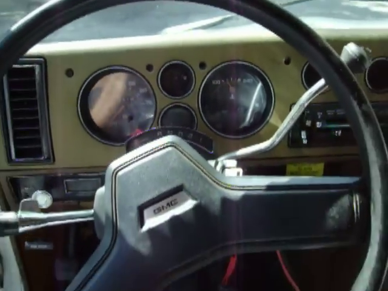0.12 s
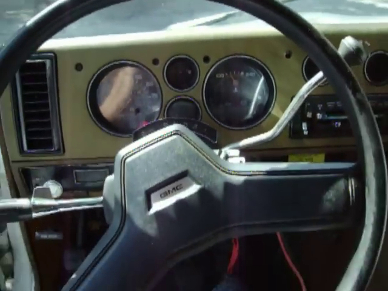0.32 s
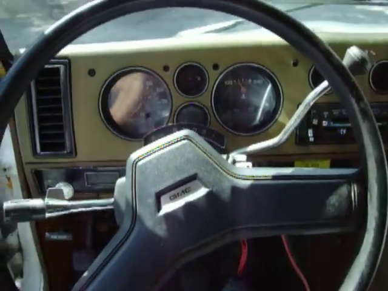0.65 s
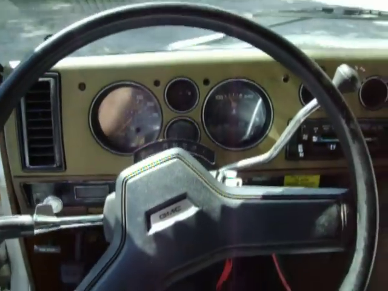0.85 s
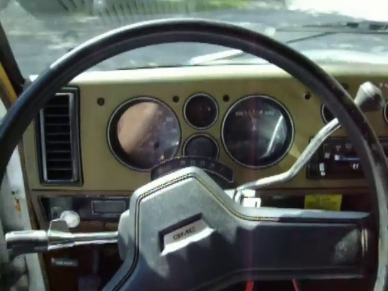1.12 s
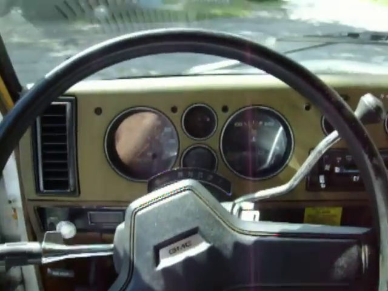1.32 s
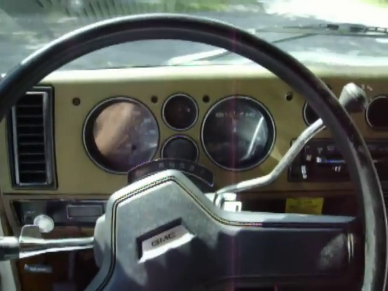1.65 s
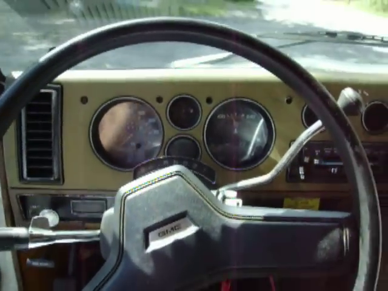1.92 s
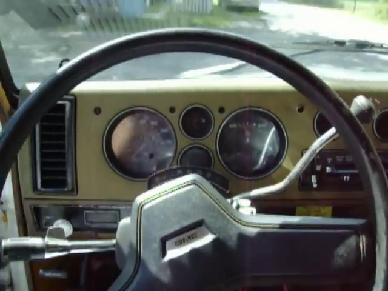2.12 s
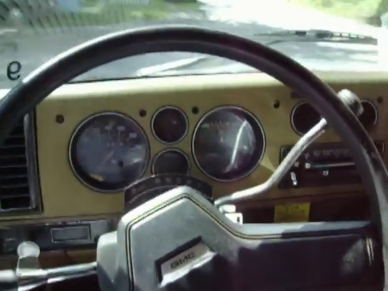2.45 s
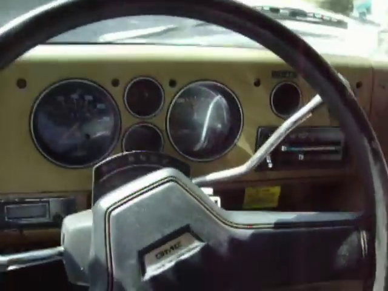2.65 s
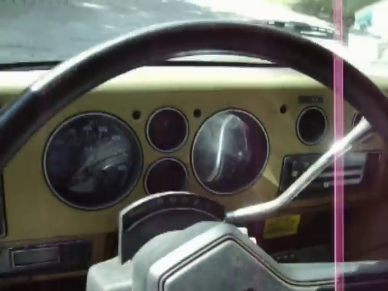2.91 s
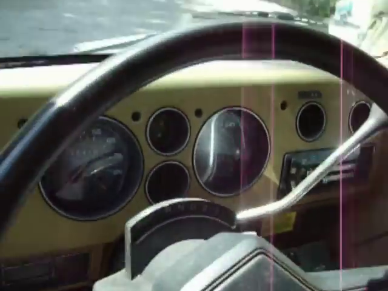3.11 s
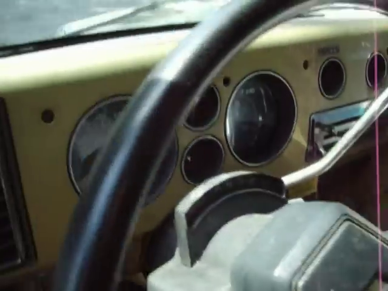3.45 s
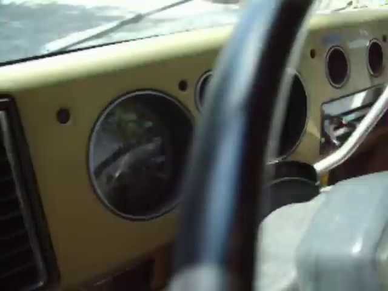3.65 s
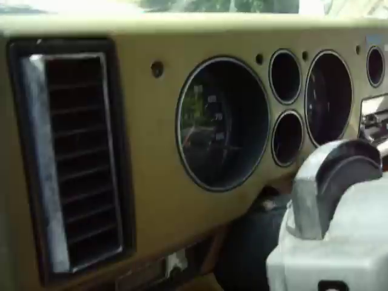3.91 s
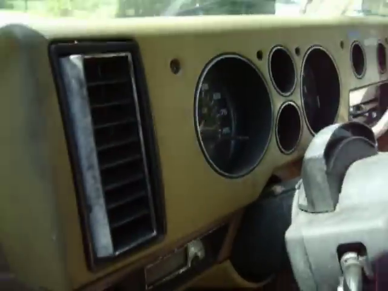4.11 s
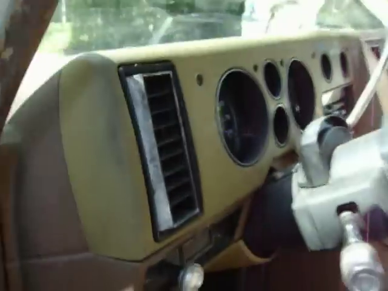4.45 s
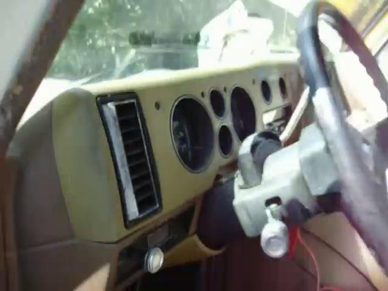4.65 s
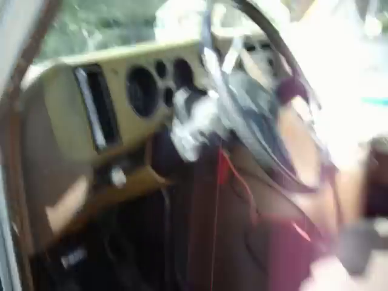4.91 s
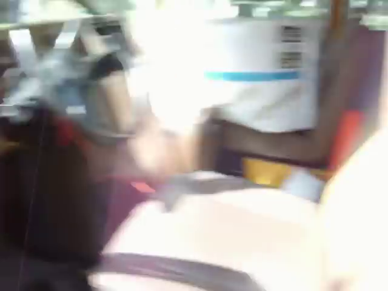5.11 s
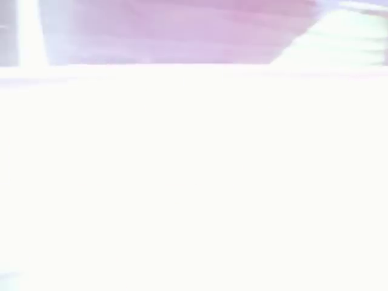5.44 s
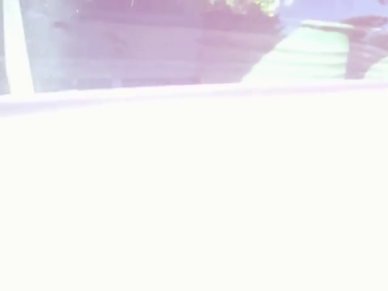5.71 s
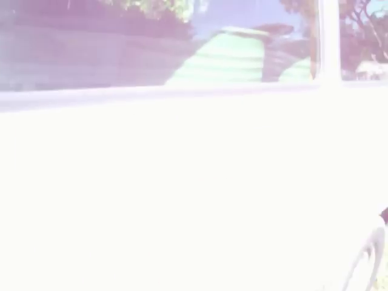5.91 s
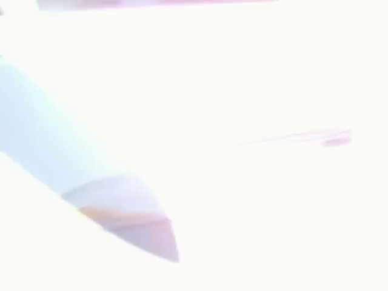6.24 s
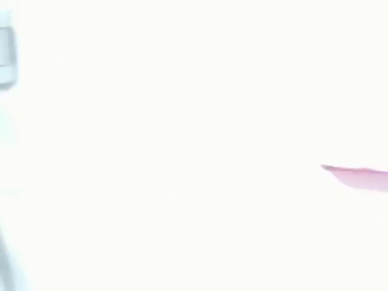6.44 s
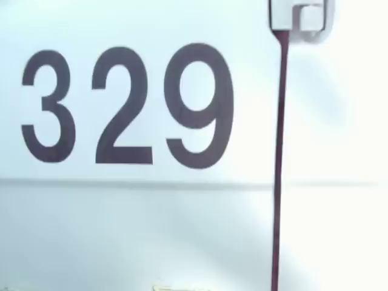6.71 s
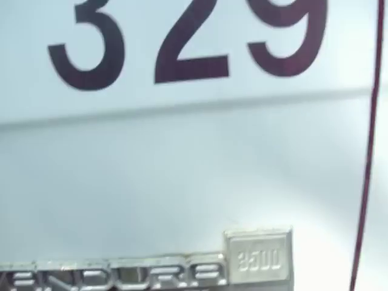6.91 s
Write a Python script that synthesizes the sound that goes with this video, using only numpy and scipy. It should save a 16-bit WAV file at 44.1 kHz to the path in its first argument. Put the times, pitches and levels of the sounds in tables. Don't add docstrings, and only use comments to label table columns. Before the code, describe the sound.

Rough, rattling diesel idle heard in a cab, with hard knocks, brief fingernail ticks, and later sharp bumps and metallic chatter on the small camera.

```python
import sys
import numpy as np
from scipy import signal
from scipy.fft import rfft, irfft, next_fast_len
from scipy.io import wavfile
from scipy.ndimage import uniform_filter1d, minimum_filter1d, map_coordinates

SR = 44100
rng = np.random.default_rng(int(sys.argv[2]) if len(sys.argv) > 2 else 0)


def gain_from_db(level_db):
    decades = np.asarray(level_db, float) / 20
    return 10 ** decades


def wrap_up_sound(samples):
    columns = np.atleast_2d(samples).T
    tamed = np.clip(columns, -1, 1)
    steps = np.round(tamed * 32767).astype(np.int16)
    wavfile.write(sys.argv[1], SR, steps)


N = 311787


def unit(x):
    return x / np.sqrt(np.mean(x ** 2) + 1e-20)


def curves(rows):
    s, *columns = np.transpose(rows)
    return [np.interp(np.arange(N) / SR, s, column) for column in columns]


def wobble(rate):
    knots = rng.standard_normal(int(N * rate / SR) + 4)
    return map_coordinates(knots, [np.arange(N) * rate / SR])


def filtered(x, response):
    m = next_fast_len(N + SR // 2)
    return irfft(rfft(x, m) * response(np.fft.rfftfreq(m, 1 / SR)), m)[..., :N]


def colour(points):
    f, db = np.transpose(points)
    return lambda hz: gain_from_db(np.interp(np.log(hz + 1), np.log(f + 1), db, left=-120, right=-120))


def resonances(modes):
    def response(f):
        return sum((-1) ** k * gain_from_db(db) * 1j * f * width / (hz * hz - f * f + 1j * f * width)
                   for k, (hz, width, db) in enumerate(modes))
    return response


# [t/s, f/Hz, level/dB]
PANEL_BOOM = [
    (0.0, 49.7, -14),
    (0.264, 50.7, -34.5),
    (0.36, 48.6, -22.5),
    (0.46, 47.2, -27),
    (0.6, 54.5, -14.5),
    (0.68, 56, -25.5),
    (0.8, 55, -18),
    (0.93, 50.7, -20),
    (1.1, 50.4, -42.5),
]


def panel():
    hz, db = curves(PANEL_BOOM)
    sounding = np.clip((PANEL_BOOM[-1][0] - np.arange(N) / SR) / .05, 0, 1)
    return sounding * np.sqrt(2) * gain_from_db(db - 3.0) * np.sin(2 * np.pi * np.cumsum(hz) / SR)


# [t/s, peak level/dB, f/Hz, length/s]
CAMERA_BUMPS = [(.84, -16, 103, 0.079), (0.971, -19, 225.4, 0.045), (1.635, -5, 163.4, 0.029),
                (1.686, -7.5, 946, 0.012), (1.703, -9.5, 168, 0.021), (3.895, -11, 165, 0.025),
                (5.84, -12, 1231, 0.0081), (5.877, -5, 464, 0.011), (5.886, -19, 179, 0.011),
                (5.907, -4, 381, 0.0028), (5.945, -18, 333, 0.011), (5.99, -22, 160, 0.029),
                (6.059, -23.5, 243, 0.0084), (6.19, -23, 120.3, .04), (6.262, -14, 230, .009),
                (6.3, -22, 115.6, .04), (6.338, -11.5, 260, .005), (6.41, -15, 190, .008),
                (6.422, -12, 302, .006), (6.545, -17.5, 200, .012), (1.674, -9, 159, 0.0065),
                (1.682, -12.5, 1920, 0.0043), (2.0, -17.5, 139, .04), (3.02, -16.5, 198.5, .03)]


def bumps():
    out, t = np.zeros(N + SR), np.arange(SR // 4) / SR
    for s, db, hz, length in CAMERA_BUMPS:
        shape = np.clip(t * hz * 2, 0, 1) / (1 + (t / length) ** 6)
        out[round(s * SR):][:len(t)] += gain_from_db(db) * shape * np.sin(2 * np.pi * hz * t)
    return out[:N]


# [t/s, peak level/dB, f/Hz, t60/s]
FINGER_TICKS = [
    (2.5372, -7, 3900, .008),
    (2.549, -19, 4200, .006),
    (2.5542, -6, 3870, .008),
    (2.5617, -11, 4150, .013),
    (2.572, -8, 4160, .01),
    (2.5787, -6, 3200, .007),
    (2.5812, -10, 3600, .008),
]


def ticks():
    out, t = np.zeros(N + SR), np.arange(SR // 4) / SR
    for s, db, hz, t60 in FINGER_TICKS:
        casing_hz = rng.uniform(2500, 4600, (4, 1))
        ring = np.sin(2 * np.pi * hz * t) + .3 * np.sin(2 * np.pi * casing_hz * t).sum(axis=0)
        attack = 1 - np.exp(-(t / 0.0004) ** 2)
        decay = gain_from_db(db + 2.5 - 60 * t / max(t60, .002))
        out[round(s * SR):][:len(t)] += decay * attack * ring
    return out[:N]


# [t/s, level/dB]
CHATTER_LEVEL = [
    (6.12, -49.5),
    (6.19, -25.5),
    (6.25, -28),
    (6.285, -20.5),
    (6.345, -22.5),
    (6.375, -17),
    (6.43, -27),
    (6.5, -26),
    (6.56, -53),
]
# [f/Hz, width/Hz, level/dB]
RING_MODES = [(3520, 28, -6), (3850, 30, -12), (4010, 27, -7), (4160, 24, 1.5), (4400, 40, -9),
              (4710, 30, -10), (4910, 45, -10), (5180, 55, -15), (5450, 110, -19), (5830, 50, -27)]


def strap_ring():
    taps = (rng.random(N) < 900 / SR) * gain_from_db(2.5 * rng.standard_normal(N))
    return gain_from_db(curves(CHATTER_LEVEL)[0]) * unit(filtered(taps, resonances(RING_MODES)))


# [t/s, peak level/dB, length/s]
CASING_SHAKES = [(1.68, -6, 0.006), (1.689, -14, .008), (5.874, -9, .008), (5.9, -5.5, 0.0087),
                 (5.911, -8, 0.018), (5.94, -6.5, 0.011), (5.991, -13, 0.0089), (6.021, -17, .01),
                 (6.046, -15, 0.011), (6.142, -12.5, 0.011), (6.263, -14.5, .008), (6.286, -9, 0.0067),
                 (6.326, -17, 0.0096), (6.458, -17, 0.011), (6.502, -18, 0.0049), (6.547, -14, .008),
                 (6.561, -15.5, .008)]
# [f/Hz, level/dB]
CASING_COLOUR = [(700, -22), (1500, -8), (2600, -5), (3300, -4), (4200, -1), (4800, -7), (5400, -21),
                 (6300, -42)]


def rattles():
    shakes, t = np.zeros(N + SR), np.arange(SR // 16) / SR
    for s, db, length in CASING_SHAKES:
        shape = (1 - np.exp(-t / 0.00026)) / (1 + (t / length) ** 4)
        shakes[round(s * SR):][:len(t)] += gain_from_db(db) * shape
    return 0.45 * shakes[:N] * unit(filtered(rng.standard_normal(N), colour(CASING_COLOUR)))


# [t/s, cab enclosure level/dB, nearness to the standing-wave crest level/dB]
MIC_PLACE = [(0, 1, -2.5), (.35, -1, -4.5), (.7, -1.5, -10.5), (1.0, 1.5, -3), (1.4, 0, -0.5),
             (1.75, 1.5, -2), (2.3, -2, -1), (2.9, 2, 1), (3.3, 1, 3), (3.9, 0, 1), (4.1, -2.5, -3),
             (4.6, -3, 0), (5.0, -5, -4), (5.7, -10, -7.5), (5.95, 2.5, -12), (6.4, 0.5, -9),
             (6.7, -3.5, -11.5), (7.07, -3, -17)]


def place():
    return curves(MIC_PLACE)


# [t/s, firing rate/Hz]
IDLE_SPEED = [(0, 45.8), (1.1, 45.6), (1.35, 45.4), (2.0, 45.55), (2.7, 45.5), (3.1, 45.35), (4.3, 45.4),
              (4.6, 45.6), (5.2, 45.7), (5.6, 46.1), (7.07, 46.1)]
STRONG_FIRING_S = 4.557


def firings():
    turns = np.cumsum(curves(IDLE_SPEED)[0]) / SR
    return turns - turns[round(STRONG_FIRING_S * SR)]


EXHAUST_PUSH = [-1.2, -5.5, -1.5, 2, -2, 4, 3.4, -2]


def drone(turns):
    enclosed_db, wave_db = place()
    # order, level/dB, shares of enclosure, standing wave and exhaust push, lead/firings, unsteadiness/dB
    orders = [(2, -22, 0.049, 0.91, 1.25, 0, 2.6), (1, -26.5, 0.079, 0.25, .6, 0, 1.3),
              (3, -28.5, .6, 0.43, .8, 2, 3), (6, -34.5, -0.049, -0.35, .5, 3, 2.5)]
    out = np.zeros(N)
    for k, db, enclosed, wave, uneven, lead, unsteady_db in orders:
        push_db = np.interp(turns + lead, np.arange(8) + .5, EXHAUST_PUSH, period=8)
        level_db = db + enclosed * enclosed_db + wave * wave_db + uneven * push_db + unsteady_db * wobble(14)
        jitter = 0.089 * k * wobble(9) + 0.038 * k * k * wobble(30)
        out += np.sqrt(2) * gain_from_db(level_db) * np.sin(2 * np.pi * k * turns + jitter + rng.uniform(0, 6.0))
    return out


CYLINDER_KNOCK = [-1, -3, -6.5, -2, -4.5, -5, -3, -3.5]


def knocked(turns, scatter_db, pattern, depth_db, sharp):
    late = turns + .08 * wobble(40)
    k = np.floor(late).astype(int)
    chance_db = scatter_db * np.tanh(rng.standard_normal(1024))[k % 1024]
    size_db = pattern * np.array(CYLINDER_KNOCK)[k % 8] + chance_db
    flare = np.exp(-sharp * (late - k)) * gain_from_db(size_db + depth_db)
    return unit((1 + uniform_filter1d(flare, size=90)) * rng.standard_normal(N))


# [f/Hz, level/dB]
TIN_COLOUR = [(1650, -31.5), (2800, -10), (3480, -6), (3930, 1.5), (4150, 3.5), (4830, -8.5), (5580, -21),
              (5940, -34.5), (7720, -46.5), (13100, -120)]


def tin(turns):
    return unit(filtered(knocked(turns - 1, 4, .8, -4, 1.8), colour(TIN_COLOUR)))


# [f/Hz, level/dB]
BULKHEAD_COLOUR = [(280, -14.5), (380, -9), (550, -0.5), (700, -1.5), (950, -2), (1200, -21.5)]


def drum(turns):
    return unit(filtered(knocked(turns, 1.6, 0.7, -1.4, 2.0), colour(BULKHEAD_COLOUR)))


# [f/Hz, level/dB]
CAB_COLOUR = [(25, -40), (40, -16.5), (70, -3.5), (110, -6), (190, 1.5), (245, -4.5), (310, -1.5),
              (400, -5), (550, -10)]


def thuds(turns):
    starts = np.flatnonzero(np.diff(np.floor(turns)))
    cylinder = np.floor(turns[starts] + 1).astype(int) % 8
    uneven = np.array([0.89, -0.51, .5, -1.5, 0.024, .2, -0.95, 0.16])
    pushes = np.zeros(N)
    pushes[starts] = uneven[cylinder] + .5 * rng.standard_normal(1024)[:len(starts)]
    return unit(filtered(pushes, colour(CAB_COLOUR)))


def cab(turns):
    rumble = unit(filtered(knocked(turns, 3.7, .8, 1.8, 1.2), colour(CAB_COLOUR)))
    return unit(rumble + gain_from_db(-6.5) * thuds(turns))


# [f/Hz, width/Hz, level/dB]
COVER_MODES = [(1851, 140, 2), (2070, 83, 1.5)]


def cover(turns):
    clusters = gain_from_db(5.8 * np.tanh(wobble(9)))
    knocks = knocked(turns, 4, 3.4, 9.2, 1.7)
    return unit(clusters * filtered(knocks, lambda f: resonances(COVER_MODES)(f) ** 2))


# [f/Hz, width/Hz, level/dB]
PANEL_MODES = [(1250, 120, -11), (1545, 59, -3.5), (1617, 120, -8), (1870, 86, 0.5), (2076, 170, -9.5)]


def clacks(turns):
    out, t = np.zeros(N + SR), np.arange(SR // 16) / SR
    starts = np.flatnonzero(np.diff(np.floor(turns)))
    pitches = np.array(PANEL_MODES)[:, 0]
    envelope = gain_from_db(-60 * t / .035) * (1 - np.exp(-t / 0.0019))
    for at, panels in zip(starts, rng.random((1024, 4, 4))):
        for pick, late, size, detune in panels:
            hz = pitches[int(pick * len(pitches))] * (.94 + .12 * detune)
            level = gain_from_db(-2.5 * np.log(size + 0.026))
            out[at + int(late * .016 * SR):][:len(t)] += level * envelope * np.sin(2 * np.pi * hz * t)
    return unit(out[:N])


# [t/s, peak level/dB, f/Hz]
HARD_KNOCKS = [(0.263, -3.5, 1887), (0.44, -5, 2153), (0.693, -5, 1176), (0.49, -6, 2053),
               (0.888, -5, 1284), (1.206, -6, 1293), (1.369, -7, 1880), (1.422, -7, 1870),
               (1.811, -11, 1940), (1.86, -9.5, 1810), (1.9445, -6, 1230), (2.1207, -9, 1930),
               (2.258, -2.5, 1710), (2.5, -6.5, 1155), (3.047, -10, 1426), (3.153, -5, 1893),
               (3.497, -4.5, 1870), (3.7429, -7.5, 1506), (3.856, -11, 1440), (4.226, -4.5, 1900),
               (4.2982, -9.5, 1678), (4.548, -1.5, 1945), (4.714, -3, 2070), (5.216, -6, 1564),
               (5.361, -7, 2070), (5.427, -5, 1850), (5.673, -6.5, 1220), (5.8511, -3, 1228),
               (6.782, -7, 1240), (6.995, -5.5, 1853)]


def hard_knocks():
    out, t = np.zeros(N + SR), np.arange(SR // 16) / SR
    envelope = (1 - np.exp(-t / 0.0028)) / (1 + (t / 0.021) ** 3)
    for s, db, hz in HARD_KNOCKS:
        spread = rng.uniform(.75, 1.15, (4, 1))
        neighbours = np.sin(2 * np.pi * hz * spread * t + 6 * spread).sum(axis=0)
        swing = np.sin(2 * np.pi * hz * t) + 0.66 * neighbours
        out[round(s * SR):][:len(t)] += gain_from_db(db - 11.0) * swing * envelope
    return out[:N]


# [f/Hz, level/dB]
BLOCK_COLOUR = [(560, -32), (950, -12.5), (1030, -2), (1230, 1.5), (1750, -1), (1890, -2.5), (2380, -4.5),
                (3300, -10.5), (4290, -23.5), (7260, -120)]


def block(turns):
    ringing = resonances(PANEL_MODES)
    roar = filtered(knocked(turns, 2.9, 1.0, 0, 0.35), lambda f: colour(BLOCK_COLOUR)(f) * (2.4 + 0.19 * ringing(f)))
    return unit(unit(roar) + gain_from_db(-5.5) * clacks(turns) + gain_from_db(-6.5) * cover(turns))


def engine(turns):
    enclosed_db = place()[0]
    shake = wobble(13)
    block_db = -17 + 1.05 * shake
    cab_db = -20 + 1.2 * enclosed_db + 1.1 * wobble(10)
    drum_db = -21.5 + .4 * enclosed_db + 0.51 * shake + 1.1 * wobble(11)
    tin_db = -23 - 0.084 * enclosed_db + 0.29 * shake + 1.2 * wobble(25)
    body = gain_from_db(block_db) * block(turns) + hard_knocks()
    return body + gain_from_db(cab_db) * cab(turns) + gain_from_db(drum_db) * drum(turns) + gain_from_db(tin_db) * tin(turns)


# [t/s, depth level/dB, time to fall/s]
GAIN_DUCKS = [(.52, 4.5, .01), (1.09, 2, 0.015), (1.46, 4, 0.022), (1.695, 5.5, .015), (1.98, 1, .02),
              (2.537, 14, .004), (2.583, 19.5, 0.0037), (3.9, 4, .06), (4.43, 3.5, 0.0083), (5.0, 3, 0.011),
              (5.7, 1.5, 0.034), (5.9, 6.5, 0.028), (5.95, 7, 0.023), (6.0, 11, 0.027), (6.06, 13, .05),
              (6.14, 11.5, .02), (6.3, 9, 0.02), (6.38, 13, 0.013), (6.43, 11, 0.013), (6.51, 5, 0.014),
              (6.72, 1.5, 0.059), (6.88, -0.5, 0.059)]


def gain_control():
    hold_s, quick_share, quick_s, recover_db_per_s = 0.018, 0.26, 0.012, 36.5
    s, depth_db, fall = np.transpose(GAIN_DUCKS)[..., None]
    since = np.arange(N) / SR - s
    after = np.maximum(since - fall - hold_s, 0)
    sprung = quick_share * (1 - np.exp(-after / quick_s))
    left_db = depth_db * (1 - sprung) - recover_db_per_s * after
    drop_db = np.clip(since / np.abs(fall), 0, 1) * np.maximum(left_db, 0)
    return gain_from_db(-np.max(drop_db, axis=0))


def scene():
    turns = firings()
    near = bumps() + ticks() + strap_ring() + rattles()
    held = -minimum_filter1d(-np.abs(near), size=300)
    ducked = 1 / (1 + (uniform_filter1d(held, size=150) / 0.75) ** 2)
    far = panel() + drone(turns) + engine(turns)
    return (ducked * gain_control() * far + near)[None]


def band_limit(x):
    return signal.sosfilt(signal.butter(12, 15827, fs=SR, output="sos"), x)


# [t/s, click level/dB]
SHAVED_PEAKS = [(0.0496, -37), (0.0762, -30), (0.1418, -33.5), (0.254, -34.5), (0.453, -37.5),
                (0.6553, -25), (0.827, -33.5), (0.9863, -27), (1.0158, -29.5), (1.332, -29.5),
                (1.589, -37.5), (1.93, -39.5), (2.1897, -32), (2.2833, -33), (2.4309, -34), (3.0528, -35.5),
                (3.0956, -34), (3.1123, -28.5), (3.2218, -31.5), (3.2654, -31), (3.4665, -29.5),
                (3.5049, -32), (3.5758, -26.5), (3.6865, -28), (3.8292, -33), (4.3006, -30), (4.918, -33),
                (5.675, -32), (5.879, -27), (7.0654, -30.5)]


def record(dry):
    edge_hz, ceiling = 6070, .715
    squeezed = dry / (1 + np.abs(dry / .772) ** 6) ** (1 / 6)
    narrow = filtered(squeezed, lambda hz: (hz > 20) / (1 + (hz / edge_hz) ** 60))
    shaved = np.zeros(N + SR)
    for (s, db), (gap, size) in zip(SHAVED_PEAKS, rng.random((len(SHAVED_PEAKS), 2))):
        for late, less_db in ((.0007, 0), (.003 + 0.018 * gap, -3 - 10 * size)):
            click = gain_from_db(db + less_db + 7.5) * np.array([.45, 1, .45])
            shaved[round((s + late) * SR):][:3] = click
    return band_limit(np.clip(narrow, -ceiling, ceiling) - shaved[:N] - .002)


dry = scene()
out = record(dry)
wrap_up_sound(out)
```